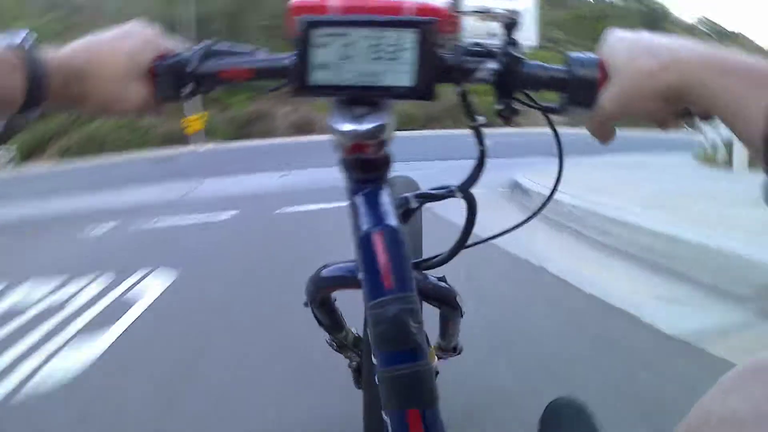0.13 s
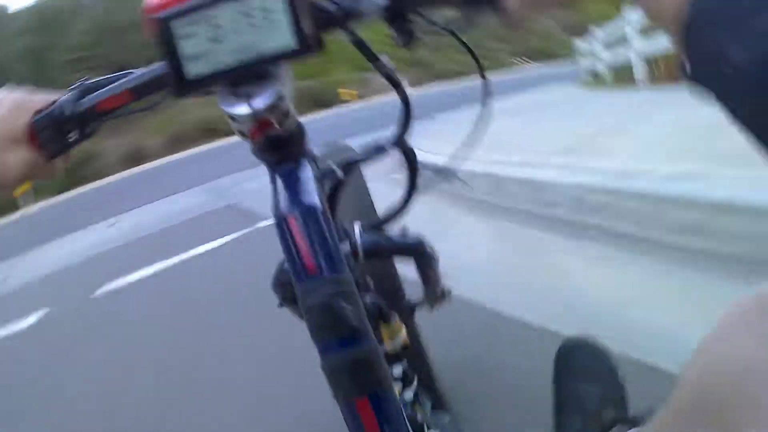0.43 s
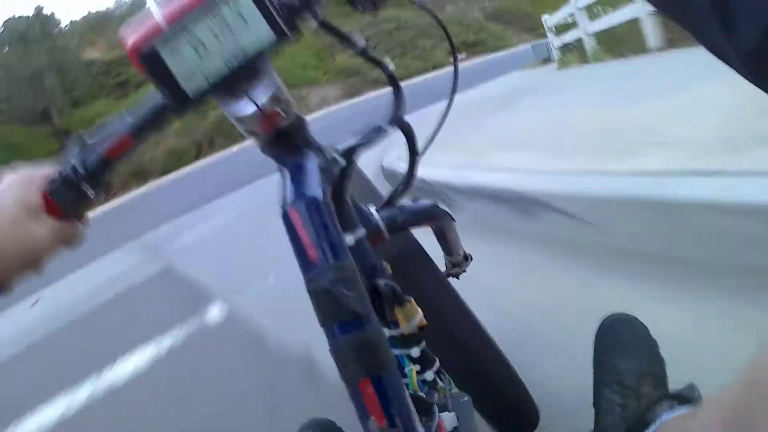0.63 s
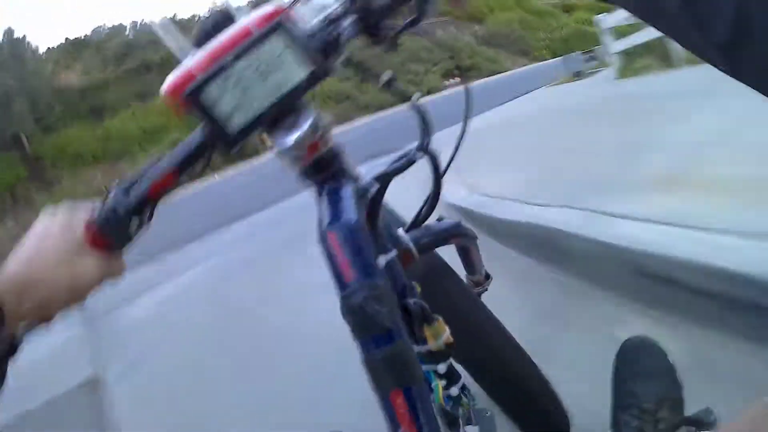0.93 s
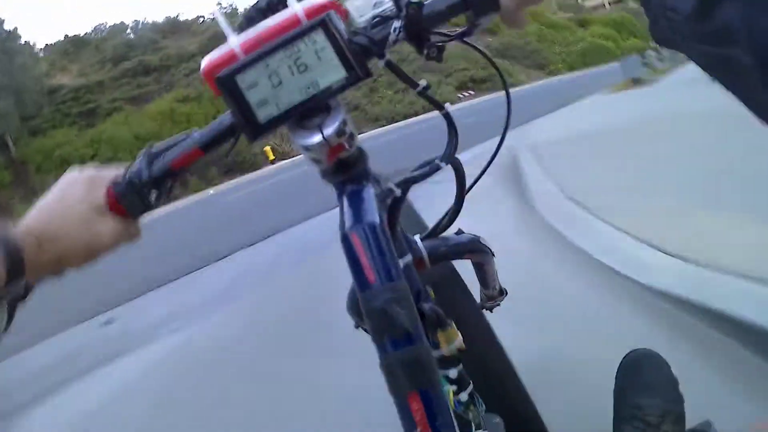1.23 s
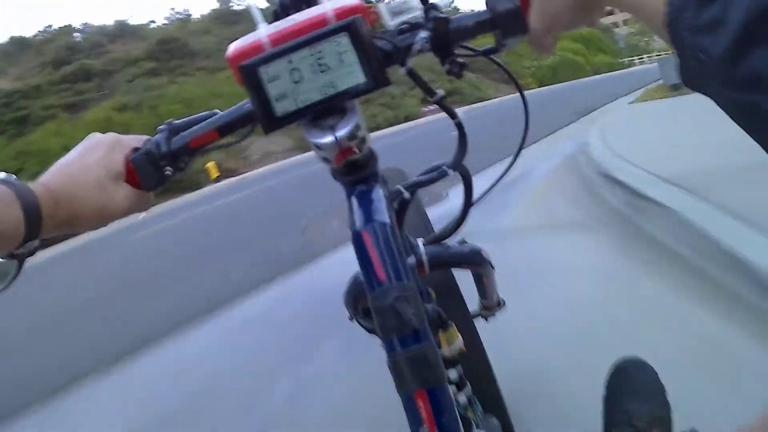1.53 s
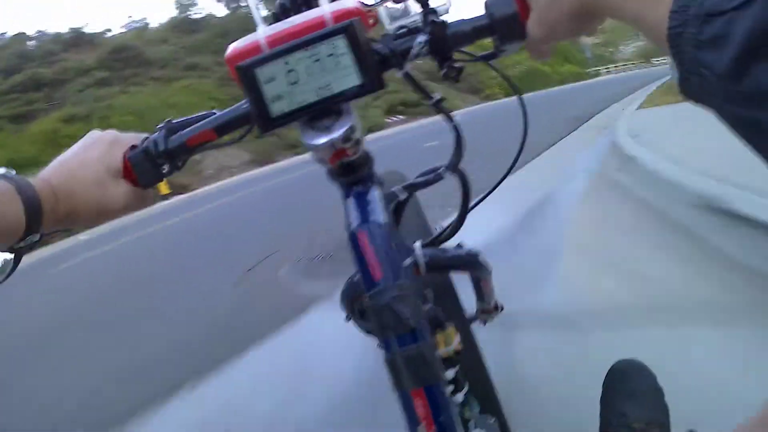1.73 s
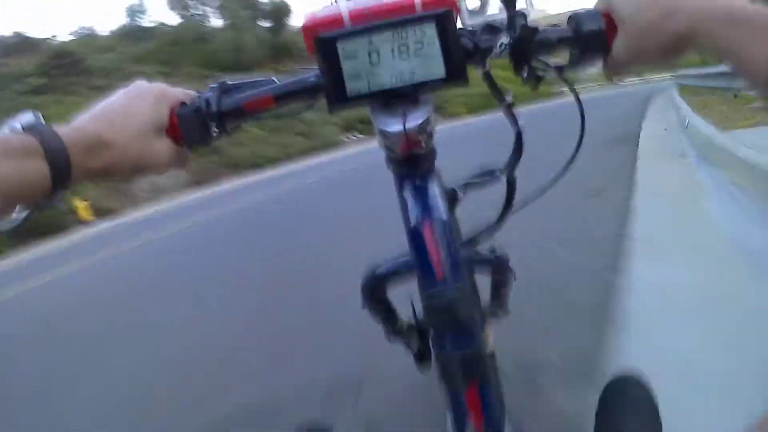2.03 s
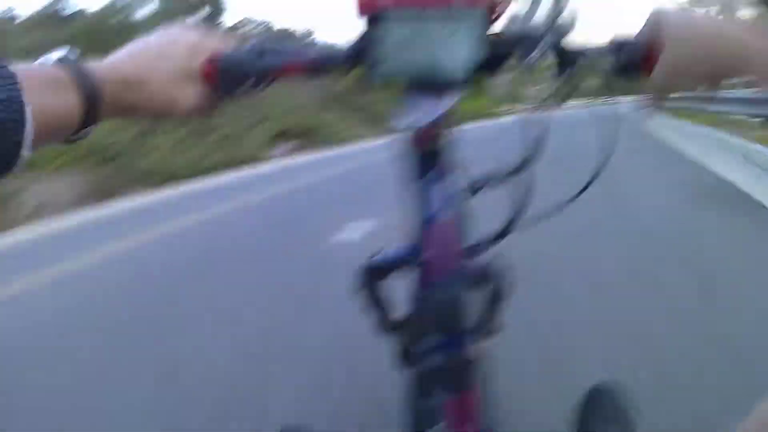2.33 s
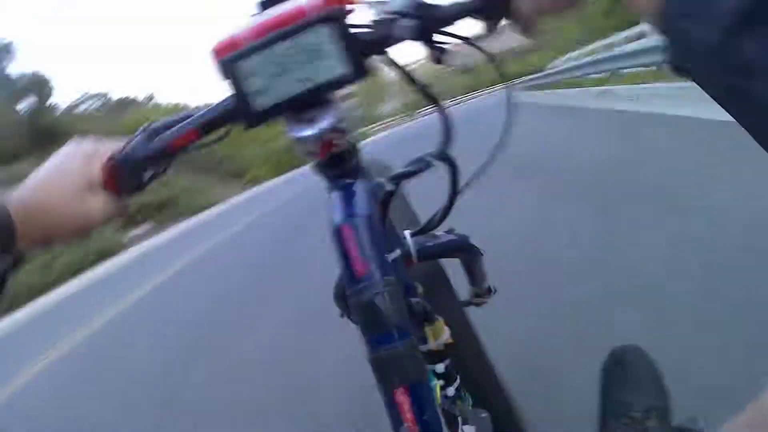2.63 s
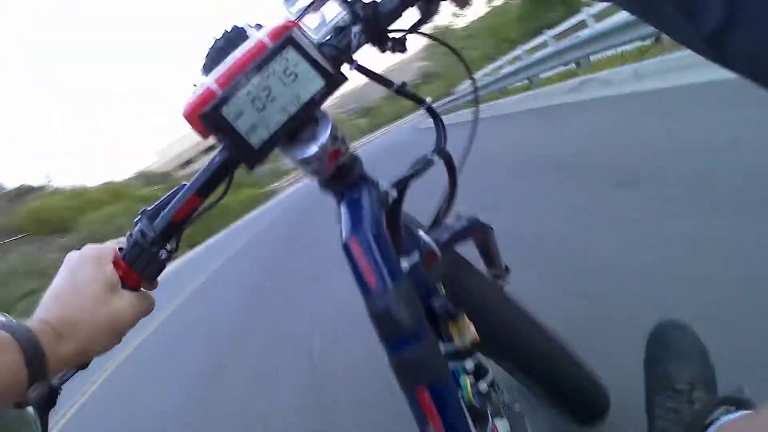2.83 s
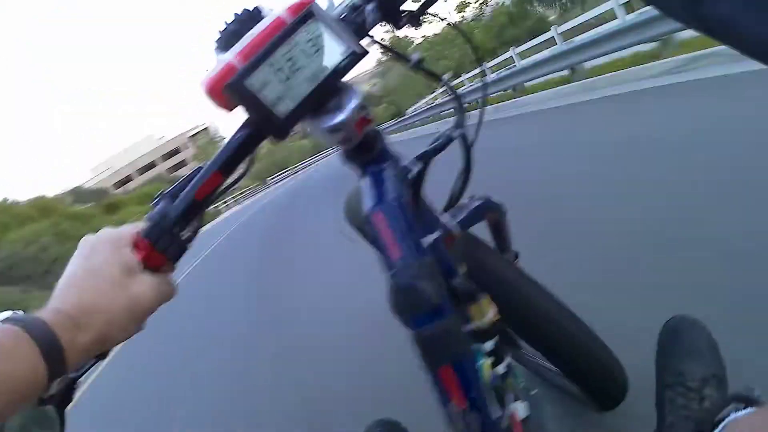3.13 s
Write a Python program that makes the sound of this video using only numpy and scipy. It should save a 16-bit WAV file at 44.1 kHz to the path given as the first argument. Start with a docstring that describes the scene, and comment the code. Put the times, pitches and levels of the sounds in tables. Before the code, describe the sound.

Rough rolling and skidding of trike wheels on a road, with wind overloading a muffled microphone

```python
"""A drift trike slides down an asphalt bend, heard at close range by a muffled microphone on the rider.
At first hard wheels grind over grit with a thin rasp and gusts shove the microphone; the rasp soon fades.
A slipping wheel sings an unsteady note, a lower groan joins briefly, and from 0.8 s road joints thud.
The frame knocks once at 1.9 s; then the grinding swells, jolts cluster and strong gusts crowd in.
Gusts that drive the microphone to its limit crackle and choke the road noise."""
import sys
import numpy as np
from scipy import signal
from scipy.fft import rfft, irfft
from scipy.io import wavfile
from scipy.ndimage import uniform_filter1d

SR = 44100
rng = np.random.default_rng(int(sys.argv[2]) if len(sys.argv) > 2 else 0)


def wav_out(sig):
    """Save sig, one row per channel (or a flat mono array), as 16-bit PCM at SR to the path in sys.argv[1]."""
    wavfile.write(sys.argv[1], SR, np.round(np.clip(np.atleast_2d(sig).T, -1, 1) * 32767).astype(np.int16))


N = 144207


def undb(db):
    """Turn decibels into an amplitude factor."""
    return 10 ** (np.asarray(db) / 20)


def unit(x):
    """Scale a sound to an RMS of 1."""
    return x / np.sqrt(np.mean(x ** 2))


def noise():
    """White noise, the raw material of moving air and scraped stone."""
    return rng.standard_normal(N)


def curve(table, axis=1):
    """One column of a table, joined by straight lines in time."""
    rows = np.array(table)
    return np.interp(np.arange(N) / SR, rows[:, 0], rows[:, axis])


def walk(rate):
    """Smooth random motion with an RMS near 1, taking about `rate` new values a second."""
    hold = max(int(SR / rate), 2)
    steps = np.repeat(rng.standard_normal(N // hold + 1), hold)
    return unit(uniform_filter1d(steps, hold)[:N])


def colour(x, points):
    """Shape a spectrum by (f/Hz, level/dB) points, joined along log frequency."""
    hz, db = np.array(points).T
    f = np.maximum(np.fft.rfftfreq(N, 1 / SR), 1)
    gain = undb(np.interp(np.log(f), np.log(hz), db))
    return irfft(rfft(x) * gain, N)


def ring(x, hz, width):
    """One resonance, gain 1 at its centre."""
    b, a = signal.iirpeak(hz, hz / width, SR)
    return signal.lfilter(b, a, x)


def ring_twice(x, hz, width):
    """The same resonance passed twice, for steeper skirts."""
    return ring(ring(x, hz, width), hz, width)


def blow(start, decay):
    """Envelope that rises in a millisecond and dies away."""
    age = np.maximum(np.arange(N) / SR - start, 0)
    return np.minimum(age * 1000, 1) * np.exp(-age / decay)


def swell(middle, half):
    """Flat-topped envelope with rounded sides."""
    offset = (np.arange(N) / SR - middle) / half
    return np.exp(-offset ** 4)


# wind at the microphone: t/s, level/dB
WIND_LEVEL = [(0, -19), (.1, -11.5), (.27, -13.5), (.42, -17), (.58, -31), (.73, -30), (.8, -21.5),
              (1.05, -22.5), (1.25, -16.5), (1.45, -23), (1.6, -16.5), (1.87, -17), (2.0, -11),
              (2.3, -17.5), (2.5, -11.5), (2.68, -23.5), (2.95, -8), (3.2, -19.5)]
# spectrum of the buffeting eddies: f/Hz, relative level/dB
EDDY_SPECTRUM = [(3, -0.5), (9, -11.5), (22, 4.5), (40, 2), (75, -6.5), (125, -22), (250, -42),
                 (600, -55.5)]
# booming flutter of the air at the microphone port, against the wind: t/s, level/dB
BOOM_LEVEL = [(0, -7.5), (.45, -6), (.7, -7.5), (1.2, -8.5), (1.7, -9), (2.1, -3.5), (2.45, -3.5),
              (2.75, -3.5), (3.27, 1.5)]
# big gusts: middle t/s, half length/s, pressure/full scale (negative sucks)
GUST_PUSHES = [(.039, .012, -0.8), (.146, .008, -0.4), (0.256, 0.0048, -0.58), (0.289, 0.006, 0.58),
               (0.358, .012, -0.52), (1.023, .006, -.3), (1.306, 0.0065, .34), (1.513, 0.0069, -0.38),
               (1.692, .009, -0.32), (1.916, 0.0052, -0.47), (1.984, 0.0089, -0.4), (1.997, 0.0031, .47),
               (2.038, 0.0021, -.45), (2.083, 0.0028, 0.69), (2.117, 0.0056, -0.75), (2.197, 0.014, 0.58),
               (2.318, .012, -0.44), (2.331, 0.0032, 0.87), (2.348, .008, -0.85), (2.444, 0.011, 0.8),
               (2.463, 0.0022, 0.93), (2.479, 0.0067, -.66), (2.506, 0.011, -0.93), (2.535, .014, -0.74),
               (2.561, 0.0076, 0.78), (2.591, 0.013, 0.46), (2.705, .008, 0.51), (2.814, .013, 0.69),
               (2.869, .018, -0.95), (2.913, 0.014, 0.76), (2.941, 0.0037, 0.46), (2.951, 0.0043, -0.53),
               (2.971, .009, 0.44), (2.991, 0.0046, 0.52), (2.999, 0.0039, -0.66), (3.027, 0.012, -1.15),
               (3.071, 0.03, 0.49), (3.15, 0.014, -0.63), (3.259, 0.0054, -0.91)]
BOOM_HZ, BOOM_WIDTH_HZ, BOOM_SWING_DB = 85, 45, 3.5
EDDY_LIMIT = .35  # greatest pressure of ordinary eddies and boom, full scales
GUST_SHARE = .8  # share of them that a gust displaces


def wind():
    """Eddies rumble and boom on the microphone; big gusts displace them with a steady push or suck."""
    strength = undb(curve(WIND_LEVEL))
    eddies = unit(colour(noise(), EDDY_SPECTRUM)) * strength
    boom = ring_twice(noise(), BOOM_HZ, BOOM_WIDTH_HZ)
    boom = unit(boom * undb(BOOM_SWING_DB * walk(25)))
    air = eddies + boom * strength * undb(curve(BOOM_LEVEL))
    air = EDDY_LIMIT * np.tanh(air / EDDY_LIMIT)
    push, calm = 0, 1
    for middle, half, pressure in GUST_PUSHES:
        gust = swell(middle, half)
        push = push + pressure * gust
        calm = calm * (1 - GUST_SHARE * gust)
    return push + calm * air


# jolts at joints in the road: t/s, level/dB, decay/s
JOINTS = [(.797, -11.5, 0.0077), (1.058, -16.5, .011), (1.127, -19.5, 0.028), (1.741, -13.5, .013),
          (2.042, -4.5, 0.015), (2.064, -8, 0.012), (2.153, -4.5, 0.025), (2.175, -13.5, .009),
          (2.244, -6.5, .005), (2.35, -12, 0.0095), (2.512, -13, .007)]
# spectrum of their thud: f/Hz, relative level/dB
THUD_SPECTRUM = [(80, 7), (300, -1.5), (550, 1.5), (1200, 1.5), (1900, -6.5), (2600, -15), (3600, -16.5)]
# resonances of the sharp frame knock: f/Hz, width/Hz, relative level/dB
KNOCK_MODES = [(1150, 570, -5), (2190, 230, 12), (2700, 280, -6.5), (3403, 300, -20)]
KNOCK_S, KNOCK_DB, KNOCK_DECAY_S = 1.898, -11, 0.0052


def jolts():
    """Wheels bang over joints as short bursts of coloured noise, and the resonant frame knocks once."""
    bangs = sum(undb(db) * blow(start, decay) for start, db, decay in JOINTS)
    thuds = unit(colour(noise(), THUD_SPECTRUM)) * bangs
    rattle = noise()
    knock = unit(sum(undb(db) * ring(rattle, hz, width) for hz, width, db in KNOCK_MODES))
    return thuds + knock * undb(KNOCK_DB) * blow(KNOCK_S, KNOCK_DECAY_S)


GRIT_PER_S, GRIT_SPREAD_DB = 1500, 3.5  # mean rate of stones, spread of their sizes
GRIT_SHARE = 0.46  # power share of stones against smooth scrape


def grit():
    """Stones of all sizes strike the wheels at random, over a smooth scrape."""
    hits = rng.random(N) < GRIT_PER_S / SR
    sizes = undb(GRIT_SPREAD_DB * noise())
    stones = hits * rng.choice([-1, 1], N) * sizes
    return np.sqrt(GRIT_SHARE) * unit(stones) + np.sqrt(1 - GRIT_SHARE) * noise()


# thin rasp before the bend: t/s, level/dB
RASP_LEVEL = [(0, -37), (.35, -32.5), (.55, -38), (.8, -50)]
RASP_HZ, RASP_WIDTH_HZ = 2158, 360


def rasp():
    """Grit through one narrow resonance: a thin rasp that fades as the trike turns in."""
    return unit(ring_twice(grit(), RASP_HZ, RASP_WIDTH_HZ)) * undb(curve(RASP_LEVEL))


# note of the slipping wheels: t/s, f/Hz, level/dB
SONG = [(0, 480, -40), (.3, 462, -24.5), (.6, 425, -33), (.655, 437, -19.5), (.76, 452, -17.5),
        (.82, 475, -22.5), (.92, 458, -24), (1.02, 472, -19.5), (1.09, 478, -43), (1.2, 480, -22.5),
        (1.28, 468, -24), (1.41, 470, -38), (1.58, 490, -23.5), (1.67, 490, -29.5), (1.8, 518, -20.5),
        (1.9, 520, -28.5), (2.03, 535, -25.5), (2.4, 486, -24.5), (2.6, 505, -40), (2.68, 495, -19.5),
        (2.76, 478, -23.5), (2.9, 487, -37), (3.27, 479, -31)]
# short lower groan of a wheel as the slide begins: t/s, f/Hz, level/dB
LOW_GROAN = [(.33, 336, -66), (.44, 348.4, -22), (.5, 354, -21.5), (.62, 359, -67)]
PITCH_WAVER = .017  # fraction of the pitch
SING_FLUTTER_DB, OCTAVE_DB = 1.8, -25
HOARSENESS = .28  # amplitude of the rough edge


def singing(table):
    """Sticking and slipping, a wheel holds an unsteady note with a hoarse edge that follows its pitch."""
    pitch = curve(table) * (1 + PITCH_WAVER * walk(110))
    phase = 2 * np.pi * np.cumsum(pitch) / SR
    note = np.sin(phase) + undb(OCTAVE_DB) * np.sin(2 * phase)
    note = note * undb(SING_FLUTTER_DB * walk(70))
    hoarse = walk(130) * np.sin(phase) + walk(130) * np.cos(phase)
    return unit(note + HOARSENESS * hoarse) * undb(curve(table, axis=2))


# grinding of the wheels, before tone, judder and hops: t/s, level/dB
GRIND_LEVEL = [(0, -18), (.17, -21), (.44, -18.5), (.66, -18), (.85, -21), (1.12, -18), (1.4, -21.5),
               (1.68, -17.5), (1.78, -15.5), (1.89, -20), (2.0, -11.5), (2.19, -12), (2.3, -15.5),
               (2.44, -11.5), (2.62, -14), (2.8, -14), (3.0, -14.5), (3.27, -15)]
# spectrum of rolling on asphalt: f/Hz, relative level/dB
ROAD_SPECTRUM = [(60, -17), (130, -5), (250, -1), (420, -5), (560, -3), (700, -5), (900, -1), (1350, -8.5),
                 (1950, -10.5), (2500, -17.5), (2800, -17), (3600, -19.5)]
# resonances of wheels, frame and camera case: f/Hz, width/Hz, relative level/dB
BODY_MODES = [(169.4, 29, 5), (346, 58, 2.5), (479.5, 78.4, 5), (809, 40, -6.5), (1663, 100, -7.5),
              (2258, 110, -16.5)]
# changing tone of the grinding: t/s, low-mid level/dB, upper-mid level/dB, treble level/dB
GRIND_TONE = [(0, 4, 0, -2), (.4, 1.5, 2.5, -3), (.6, 0.5, 1.5, 2.5), (.85, 5, 1, 1.5), (1.05, 0, 1, 1),
              (1.4, -0.5, -0.5, -2.5), (1.8, -2, -0.5, -0.5), (2.06, -2, -2.5, -1.5), (2.35, 1, 0.5, -2.5),
              (2.65, -1, 1, -0.5), (3.27, 1, 5, 2.5)]
JUDDER_PER_S, JUDDER_DB = 110, 1.04
FLICKER_PER_S, FLICKER_DB = 30, 1
SPUTTER_PER_S, SPUTTER_DB = 65, 1.7
HOP_DB, HOP_LEAD_S, HOP_S = -3.5, 0.011, 0.0072  # dip before each jolt, its lead and half length


def rolling():
    """Grit drives hollow wheels and frame; bands flicker as contact shifts, treble sputters, wheels skip."""
    scrape = colour(grit(), ROAD_SPECTRUM)
    body = 0
    for hz, width, db in BODY_MODES:
        body = body + undb(db + FLICKER_DB * walk(7.8)) * ring(grit(), hz, width)
    spectrum = rfft(unit(scrape + body))
    f = np.fft.rfftfreq(N, 1 / SR)

    lows, mids, treble = [curve(GRIND_TONE, axis) for axis in (1, 2, 3)]
    sputter = SPUTTER_DB * walk(SPUTTER_PER_S)
    edges = [0, 400, 600, 1000, 1400, 1900, 2400, 3000, SR]  # Hz
    grinding = 0
    for lo, hi in zip(edges, edges[1:]):
        tone = lows * (hi <= 400) + mids * (1400 <= lo < 2400) + treble * (lo >= 2400)
        tone = tone + sputter * (lo >= 1900)
        band = irfft(spectrum * (f >= lo) * (f < hi), N)
        grinding = grinding + band * undb(FLICKER_DB * walk(FLICKER_PER_S) + tone)

    # the wheels lose grip just before each jolt
    hops = sum(swell(start - HOP_LEAD_S, HOP_S) for start, _, _ in JOINTS)
    judder = JUDDER_DB * walk(JUDDER_PER_S)
    return grinding * undb(curve(GRIND_LEVEL) + judder + HOP_DB * hops)


MUFFLE_HZ = 3662


def scene():
    """Everything reaches the microphone through a case that shuts out the treble."""
    case = signal.ellip(7, .5, 80, MUFFLE_HZ, fs=SR, output="sos")
    wheels = rasp() + singing(SONG) + singing(LOW_GROAN) + rolling()
    return signal.sosfilt(case, wind() + jolts() + wheels)[None]


# response of the recorder after the overload: f/Hz, level/dB
RESPONSE = [(3500, 0), (4800, -3.5), (9000, -2.5), (15000, -2)]
RAIL, KNEE = .72, 80  # microphone limit in full scales; a higher knee bends more sharply
LEAK = .012  # share of the overload that passes the limit
TOP_HZ = 15900


def record(dry):
    """The microphone flattens at its limit, crackling and choking what rides on a gust; a little leaks past."""
    flat = dry / (1 + np.abs(dry / RAIL) ** KNEE) ** (1 / KNEE)
    heard = colour(flat + LEAK * (dry - flat), RESPONSE)
    top = signal.ellip(8, .2, 70, TOP_HZ, fs=SR, output="sos")
    return signal.sosfilt(top, heard)


dry = scene()
out = record(dry)
wav_out(out)
```